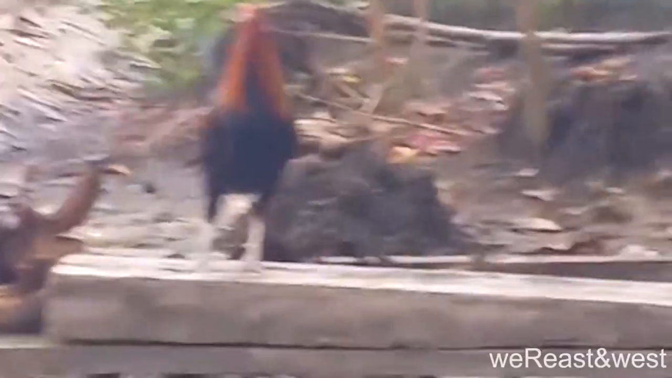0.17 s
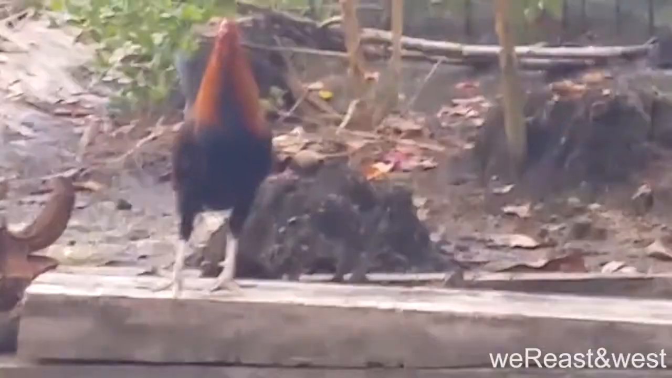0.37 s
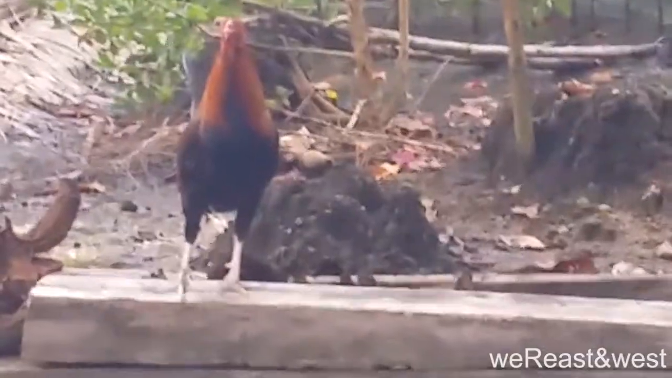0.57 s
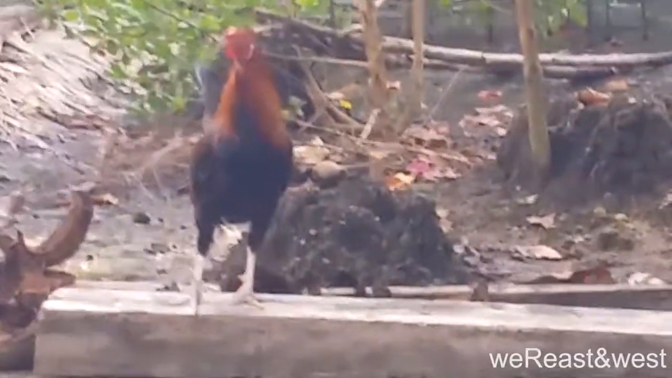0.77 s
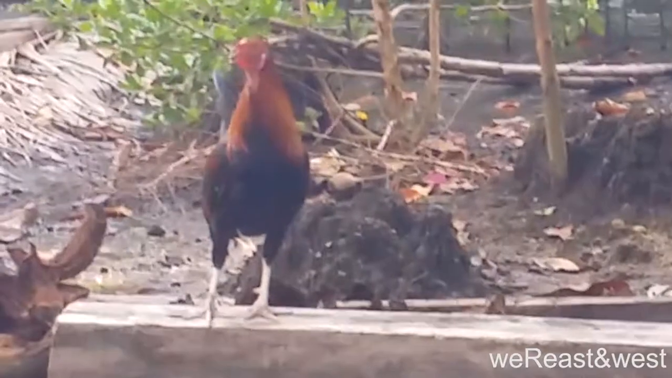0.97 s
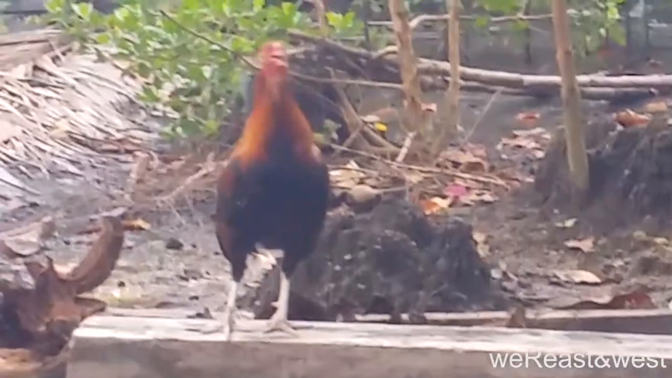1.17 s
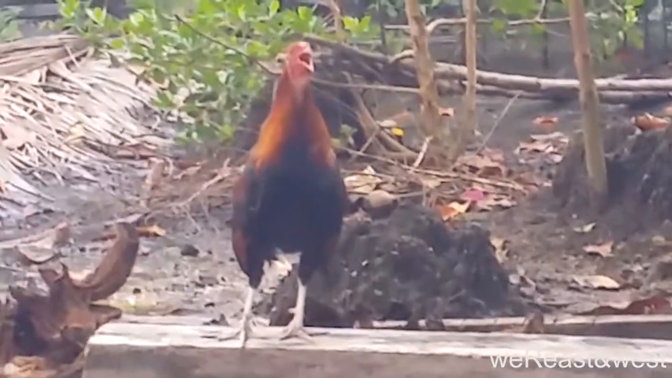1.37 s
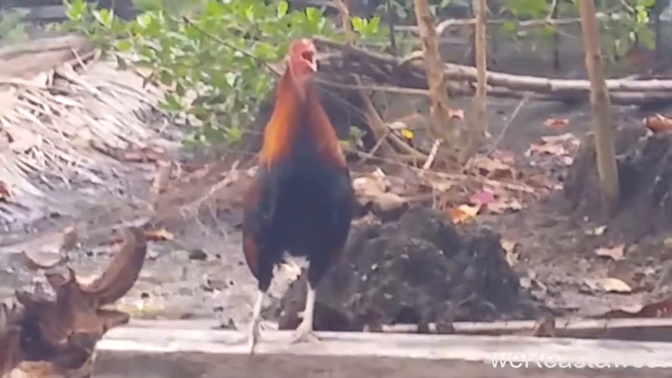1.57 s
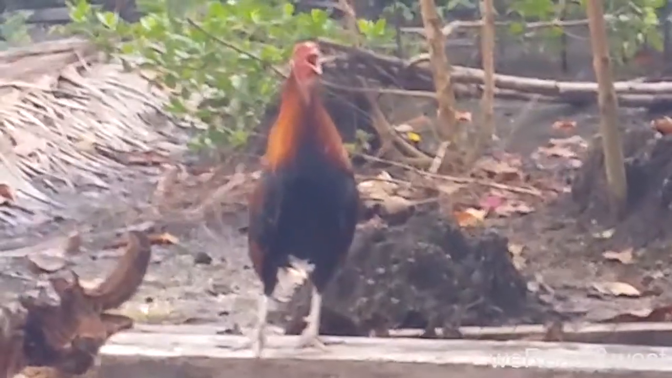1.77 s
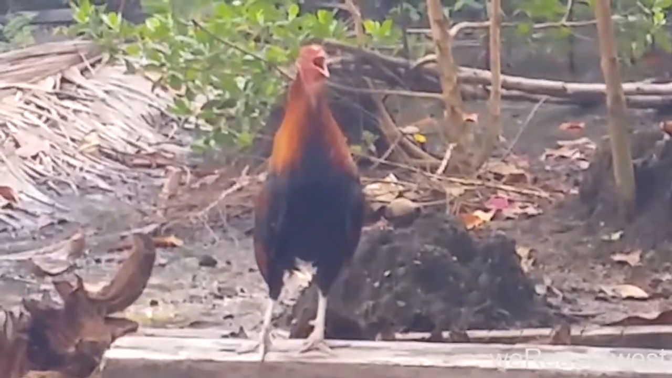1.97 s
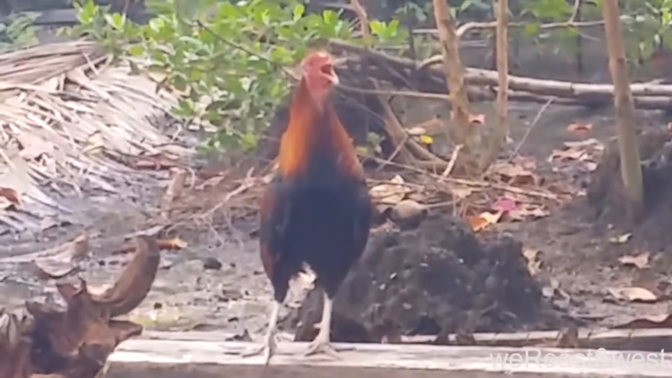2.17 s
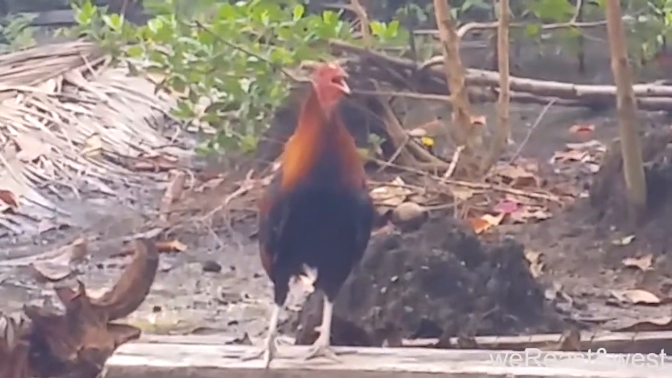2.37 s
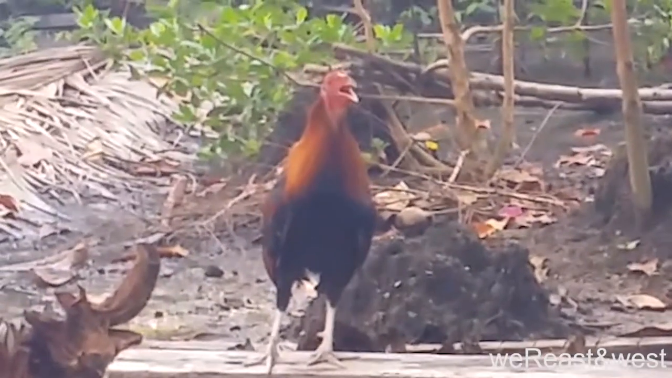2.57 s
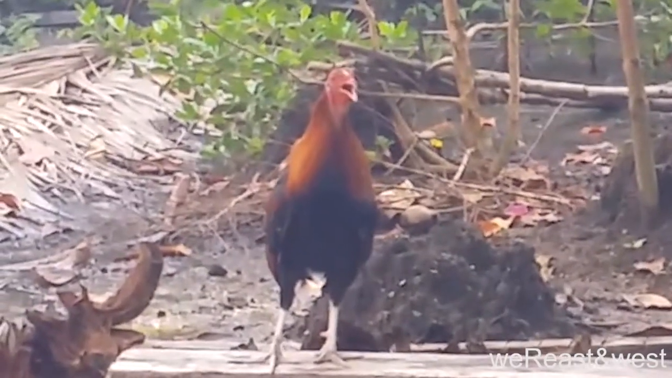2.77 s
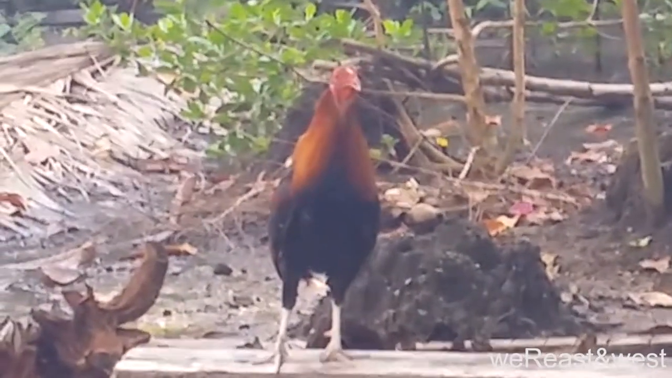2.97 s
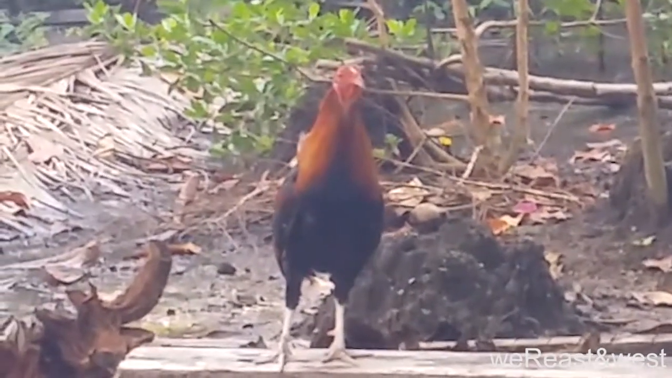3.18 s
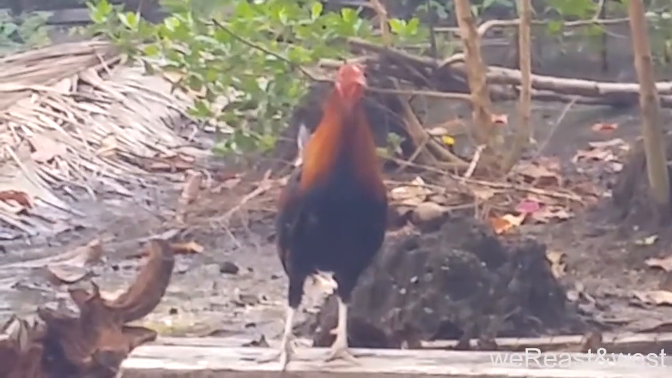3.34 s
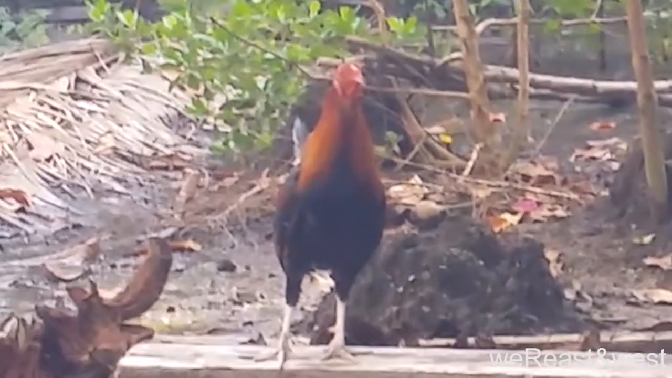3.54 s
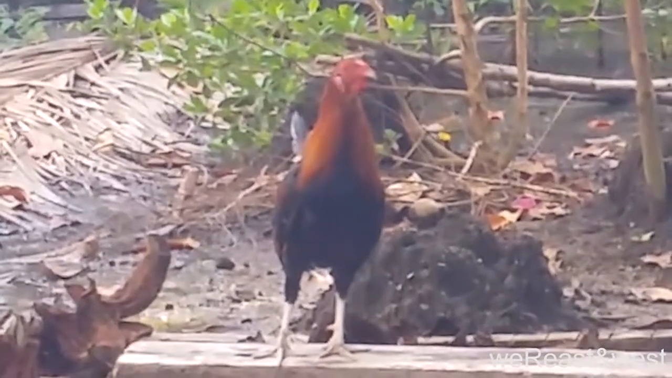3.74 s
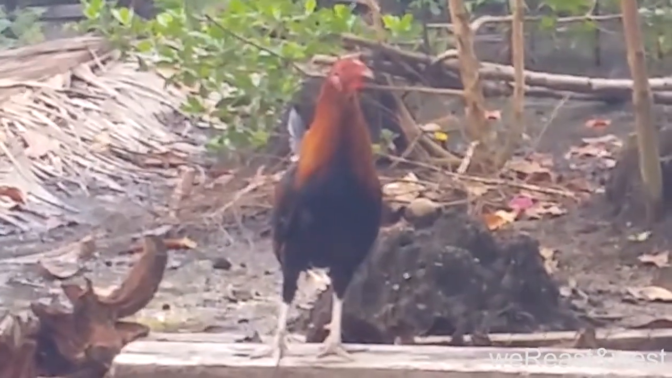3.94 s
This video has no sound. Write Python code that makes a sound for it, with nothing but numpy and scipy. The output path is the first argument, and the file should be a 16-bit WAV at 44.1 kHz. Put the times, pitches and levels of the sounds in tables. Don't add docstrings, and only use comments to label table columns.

```python
import sys
import numpy as np
from scipy import signal
from scipy.fft import rfft, irfft
from scipy.io import wavfile
from scipy.ndimage import uniform_filter1d

SR = 44100
rng = np.random.default_rng(int(sys.argv[2]) if len(sys.argv) > 2 else 0)


def field_ratio(decibels):
    return 10 ** (np.asarray(decibels, dtype=float) / 20)


def waveform_to_disk(signal):
    frames = np.transpose(np.atleast_2d(signal))
    scaled = np.clip(frames, -1, 1) * 32767
    samples = np.round(scaled).astype(np.int16)
    wavfile.write(sys.argv[1], SR, samples)


N = 176400
T = np.arange(N) / SR


def evened(x):
    return x / np.sqrt(np.mean(x ** 2) + 1e-20)


def read(points, hz):
    f, value = np.transpose(points)
    return np.interp(np.log(hz + 1), np.log(f + 1), value)


def track(points, column=1):
    columns = np.transpose(points)
    return np.interp(T, columns[0], columns[column])


def wander(rate_hz):
    hz = np.fft.rfftfreq(N, 1 / SR)[:8000]
    a, b = rng.standard_normal((2, 8000))
    return evened(irfft((a + 1j * b) * (hz > 0) / (1 + (hz / rate_hz) ** 2), N))


def bell(hz, centre_hz, width_hz):
    return 1 / (1 + (2 * (hz - centre_hz) / width_hz) ** 2)


def resonate(x, hz, width_hz):
    turn = np.exp(2j * np.pi * np.cumsum(hz * np.ones(N)) / SR)
    r = np.exp(-np.pi * width_hz / SR)
    return 2 * (turn * signal.lfilter([(1 - r) ** 2], [1, -2 * r, r * r], x / turn)).real


def echoes(x, t60_s, gap_s):
    t = T[:SR]
    taps = np.zeros((2, SR))
    at = np.arange(0, SR - 20, 20) + rng.integers(0, 20, (2, (SR - 1) // 20))
    np.put_along_axis(taps, at, rng.choice([-1., 1.], at.shape), 1)
    taps *= field_ratio(-60 * t / t60_s) * np.clip((t - gap_s) / 0.03, 0, 1)
    return signal.fftconvolve(x[None], taps / np.linalg.norm(taps[0]), axes=1)[:, :N]


# hz, density_db
HISS = [(40, -68), (130, -4.5), (300, -21), (620, -32), (1200, -35), (2600, -36.5), (8500, -46.5),
        (15500, -67)]
# hz, correlation
SAME = [(60, 1), (240, 0.96), (950, 0.26), (3770, -0.35), (15000, 0.32)]


def hiss():
    level_db, patch_db = -16.5, -0.5
    frames, hz = N // 256 + 5, np.fft.rfftfreq(1024, 1 / SR)
    a, b, c, d, patches = rng.standard_normal((frames, 513, 5)).T
    patches = evened(uniform_filter1d(uniform_filter1d(patches, 12, 0), 14, 1))
    same = np.clip(read(SAME, hz), -1, 1)[:, None]
    left = a + 1j * b
    right = same * left + np.sqrt(1 - same ** 2) * (c + 1j * d)
    z = np.array([left, right]) * field_ratio(read(HISS, hz)[:, None] + patch_db * patches)
    noise = evened(signal.istft(z, nperseg=1024, noverlap=768)[1][:, :N])
    return field_ratio(level_db + track(ENGINE, 2) + 12) * noise


# start_s, brightness_db_per_octave, level_db
ENGINE = [(0, -4.5, -21.5), (0.299, 2, -18), (1.199, 1.5, -17.5), (1.5, -13.5, -12), (2.199, -2, -17.5),
          (2.9, -9, -14.5), (3.102, -3.5, -16), (3.379, -13, -14.5), (3.55, 1, -15), (3.61, -0.5, -19.5),
          (4, -3, -20)]
# start_s, firing_hz
FIRING = [(0, 34.1), (1.2, 34.25), (1.6, 33.2), (2.1, 32.2), (3.6, 31.9), (4, 32.8)]
# hz, level_db
EXHAUST = [(34, -64), (68, -26.5), (136, 5), (205, 1), (240, -16), (310, -13), (480, -23.5), (700, -60)]
# start_s, lag_s
ENGINE_LAG = [(0, .00023), (1.0, .00023), (1.4, 0), (2.6, -.0001), (3.0, .0001), (4, .00013)]


def engine():
    drift_db, drift_hz, spread_rad, disperse_rad = 1.6, 1.2, .4, .035
    whine_hz, whine_width_hz, whine_db, whine_swell_db = 828, 66, -30, 1.5
    bass_lean_db = 1.9
    hz, tilt = track(FIRING), track(ENGINE, 1)
    turns = 2 * np.pi * np.cumsum(hz) / SR
    throb = np.zeros(N)
    for k in range(1, 21):
        order_db = read(EXHAUST, k * hz) + tilt * np.log2(k / 4) + drift_db * wander(drift_hz)
        phase = k * turns - disperse_rad * k * k + spread_rad * wander(drift_hz)
        throb += field_ratio(order_db) * np.cos(phase)
    whine = evened(resonate(rng.standard_normal(N), whine_hz, whine_width_hz))
    x = evened(throb) + field_ratio(whine_db + whine_swell_db * wander(1.6)) * whine
    x = x * field_ratio(track(ENGINE, 2))
    lag = track(ENGINE_LAG)
    both = np.array([np.interp(T - lag / 2, T, x), np.interp(T + lag / 2, T, x)])
    return both * field_ratio([[bass_lean_db / 2], [-bass_lean_db / 2]])


# start_s, length_s, from_hz, to_hz, level_db
CHIRPS = [
    (0.401, 0.046, 3650, 5850, -41.5),
    (0.432, 0.098, 4340, 6780, -47.5),
    (0.467, 0.022, 6960, 6690, -37.5),
    (0.786, 0.026, 4430, 3300, -49),
    (3.26, 0.016, 4760, 3770, -41),
]


def birds():
    x = np.zeros(N)
    for start_s, length_s, from_hz, to_hz, level_db in CHIRPS:
        u = np.clip((T - start_s) / length_s, 0, 1)
        whistle = np.sin(2 * np.pi * np.cumsum(from_hz + (to_hz - from_hz) * u) / SR)
        x += field_ratio(level_db) * np.sin(np.pi * u) * wander(150) * whistle
    return .5 * x + field_ratio(11) * echoes(x, t60_s=0.47, gap_s=0.0029)


def tick():
    start_s, level_db, decay_s = 3.592, -32, 0.0014
    u = np.maximum(T - start_s, 0)
    return field_ratio(level_db) * (u > 0) * np.exp(-u / decay_s) * rng.standard_normal((2, N))


def yard(crow):
    return field_ratio(-12) * echoes(crow, t60_s=0.7, gap_s=0.02)


def scatter(close):
    high_pass = signal.butter(2, 4500, "high", fs=SR)
    treble = signal.lfilter(*high_pass, close.mean(0))
    return field_ratio(-2) * echoes(treble, t60_s=.03, gap_s=0.00033)


# start_s, strongest_partial_hz, tone_db, half_pitch_db, rasp_db
FIRST = [
    (1.209, 1393, -50.5, -22, -60),
    (1.22, 1395, -31, -36, -8),
    (1.239, 1624, -24, -41, -24.5),
    (1.243, 1846, -2.5, -21, -38),
    (1.334, 1878, -3, -15, -33.5),
    (1.355, 1810, -4, -44, -16),
    (1.372, 1754, -12, -2.5, -19),
    (1.402, 1830, -18.5, 8.5, -24),
    (1.489, 1860, -27, -13, -38),
]
SECOND = [
    (1.497, 1632, -43, -16, -32),
    (1.511, 1636, -29, 8.5, -13),
    (1.52, 1888, -5.5, -10, -28.5),
    (1.543, 2133, -6, -45, -30.5),
    (1.585, 2116, -7, -57, -52),
    (1.625, 1930, -3, -45, -44),
    (1.674, 1907, -6, -27, -38),
    (1.719, 1921, -5.5, -46, -37.5),
    (1.77, 1939, -4.5, -40, -52),
]
THIRD = [
    (1.814, 1952, -5.5, -36, -31.5),
    (1.844, 1970, -1.5, -52, -43.5),
    (1.862, 2062, -4, -31, -31.5),
    (1.895, 2058, -8, -2.5, -39.5),
    (1.918, 2038, -6, -25, -29),
    (1.999, 2083, -6.5, -36, -26.5),
    (2.07, 2024, -7, -32, -25),
    (2.095, 1916, -4, -39, -40),
    (2.125, 1910, -9, -26, -25.5),
]
FOURTH = [
    (2.146, 1881, -19.5, 9, -16),
    (2.21, 1844, -19.5, -0.5, -18),
    (2.26, 1560, -41, 12, -9),
    (2.274, 1812, -13, -30, -7.5),
    (2.297, 1875, 0, -25, -45),
    (2.323, 2045, -7.5, -14, -53.5),
    (2.38, 1937, -10.5, 4, -34),
    (2.409, 2031, -10, -8, -43.5),
    (2.517, 1987, -13, 0.5, -48.5),
    (2.597, 1983, -15.5, 3, -45.5),
]
LAST = [
    (2.603, 1858, -7.5, -5, -25.5),
    (2.64, 1815, -14, 1, -20),
    (2.693, 1783, -10.5, -6.5, -26),
    (2.74, 1779, -9, -11, -35.5),
    (2.777, 1749, -8, -13.5, -43),
    (2.793, 1587, -23.5, -6.5, -11),
    (2.809, 1412, -25, -9, -18.5),
    (2.85, 1372, -55, -0.5, -6),
]
# start_s (centre), half_length_s, rasp_db, pitch_slip_hz, tone_dip_db
STUMBLES = [(1.546, 0.0066, -35.5, -3, 6), (1.626, 0.0064, -39.5, -16.5, 8.5), (1.658, 0.0075, -22, 0.5, 2),
            (1.685, 0.0069, -19.5, -1, 2.5), (1.703, 0.003, -26, 1.5, -3.5),
            (1.746, 0.0071, -27.5, 10, 1.5), (1.794, 0.006, -24, 16.5, 1), (1.817, 0.0043, -23, 1, -3),
            (1.827, .005, -35.5, 92.5, 3.5), (1.856, .004, -24, 87, 8.5), (1.924, 0.0081, -18, 0, 1),
            (1.942, 0.0067, -16.5, -48, 3.5), (1.968, 0.0063, -20, 0.5, 2.5),
            (2.004, .006, -24.5, 0.5, 1.5), (2.035, 0.0059, -20.5, 2, 2.5), (2.056, 0.0087, -20, -0.5, 0.5),
            (2.073, 0.0072, -20, -1, -0.5), (2.133, .012, -14, -2, -1.5), (2.624, 0.0081, -14.5, 0, 3),
            (2.685, 0.017, -13, 2, 0)]


def syrinx():
    wobble, shake = 0.002, .024
    course = np.array(FIRST + SECOND + THIRD + FOURTH + LAST)
    top_hz, tone_db, half_db, rasp_db = (track(course, i) for i in range(1, 5))
    lapse = np.array([np.exp(-((T - at_s) / half_s) ** 2) for at_s, half_s, *_ in STUMBLES])
    _, _, lapse_db, slip_hz, dip_db = np.transpose(STUMBLES)
    rasp_db = 20 * np.log10(field_ratio(rasp_db) + field_ratio(lapse_db) @ lapse)
    tone_db = tone_db - dip_db @ lapse
    rough = np.sqrt(np.minimum(field_ratio(rasp_db - tone_db), .5))
    hz = (top_hz + slip_hz @ lapse) / 4
    hz = hz * (1 + wobble * wander(60) + shake * rough * wander(120))
    return hz, tone_db, half_db, rasp_db, rough


# start_s, resonance_hz, level_db
BEAK, BEAK_WIDTH_HZ = [(1.2, 7100, -5.5), (1.601, 6770, -11.5), (1.9, 6227, -13.5), (2.2, 5920, -16.5),
                       (2.35, 7200, -8), (2.6, 6864, -3), (2.85, 7070, -4)], 720
# start_s, level_db
GULLET, GULLET_HZ, GULLET_WIDTH_HZ = [(1.2, -4.5), (1.55, 5), (1.7, 13.5), (2.1, 9.5), (2.28, -2),
                                      (2.4, 2.5), (2.75, -26), (2.82, -1)], 3640, 330
# start_s, resonance_hz, level_db
MOUTH, MOUTH_WIDTH_HZ = [(1.221, 2636, 14), (1.27, 2430, 7.3), (1.7, 2480, 13.4), (1.88, 2558, 12.4),
                         (1.93, 2510, 16.7), (2.27, 2450, 3.4), (2.33, 2550, 9.9), (2.588, 2463, 4.8),
                         (2.62, 2101, 3.6), (2.8, 2180, 0.91)], 326


def cavities():
    beak = field_ratio(track(BEAK, 2)) / np.sqrt(BEAK_WIDTH_HZ)
    gullet = field_ratio(track(GULLET)) / np.sqrt(GULLET_WIDTH_HZ)
    mouth = field_ratio(track(MOUTH, 2)) / np.sqrt(MOUTH_WIDTH_HZ)
    return (track(BEAK), beak), (GULLET_HZ, gullet), (track(MOUTH), mouth)


# hz, level_db
TRACT = [(850, -1.5), (1050, -11.5), (1400, -0.5), (1900, 8), (2500, -6), (3700, -10.5), (7000, -1),
         (15000, -5.5)]
# resonance_hz, width_hz, level_db
PIPE = [(803, 103, 3), (1296, 214, 2.5), (1967, 533, 7), (5000, 3500, -8.5), (9400, 8300, -15.5)]
# start_s, level_db
LOWEST = [(1.235, 6.5), (1.26, -3), (1.5, 4), (1.7, 8), (1.8, 2), (2.1, 4.5), (2.3, -4.5), (2.58, 2),
          (2.62, 0.5), (2.77, -1.5), (2.8, 3.5)]
# start_s, level_db
THIRDS = [(1.645, -62), (1.66, -25), (1.70, -23), (1.715, -60), (1.9, -60), (1.915, -17), (2.0, -28),
          (2.08, -16), (2.095, -60)]


def voice(hz, tone_db, half_db, rough):
    flutter_db, throb_db, shake_db, smear_rad = 2, 1.0, 2.5, .3
    quarter_s, quarter_length_s, quarter_depth = 3.5, 0.033, 0.56
    (beak_hz, beak), (gullet_hz, gullet), (mouth_hz, mouth) = cavities()
    grid = np.arange(0., 20000, 20)
    pipe = sum(field_ratio(db) / np.sqrt(w) * bell(grid, f, w) for f, w, db in PIPE)
    pipe = pipe * field_ratio(read(TRACT, grid))

    def windpipe(f):
        return np.interp(f, grid, pipe)

    def cavity(f):
        return mouth * field_ratio(read(TRACT, 2500)) * bell(f, mouth_hz, MOUTH_WIDTH_HZ) ** 1.66

    turns, x = 2 * np.pi * np.cumsum(hz) / SR, np.zeros(N)
    lowest_db = track(LOWEST)
    for k in range(2, 31):
        f = k * hz
        way = windpipe(f) + (k > 4) * cavity(f)
        way += beak * field_ratio(read(TRACT, 7000)) * bell(f, beak_hz, BEAK_WIDTH_HZ)
        way += gullet * field_ratio(read(TRACT, 3700)) * bell(f, gullet_hz, GULLET_WIDTH_HZ)
        line_db = k % 2 * half_db + (k == 2) * lowest_db + (abs(k - 4) > 1) * flutter_db * wander(41)
        phase = k * turns + k * k + smear_rad * rough * (k - 4) * wander(104)
        x += way * field_ratio(line_db) * np.cos(phase)
    thirds_db = track(THIRDS) + 1.3 * wander(49)
    for k in (2, 4, 5, 7, 8, 10, 11):
        f = k * hz * 2 / 3
        line = np.cos(k * turns * 2 / 3 + 0.49 * wander(49))
        x += (windpipe(f) + cavity(f)) * field_ratio(thirds_db + 1.3 * wander(40)) * line
    level_db = tone_db + throb_db * wander(45) + shake_db * rough * wander(106)
    x *= np.sqrt(2) * field_ratio(level_db) / windpipe(4 * hz)
    quarter = np.exp(-((T - quarter_s) / quarter_length_s) ** 2)
    return x * (1 + quarter_depth * quarter * np.cos(turns / 2))


def rasp(hz):
    jitter, lump_db, gullet_db = 0.27, 2.2, -6
    (beak_hz, beak), (gullet_hz, gullet), (mouth_hz, mouth) = cavities()
    beats = np.cumsum(2 * hz * field_ratio(8.7 * jitter * wander(400))) / SR
    pulses = np.diff(np.floor(beats), prepend=0) * (1 + .5 * rng.standard_normal(N))
    drive = evened(pulses - pulses.mean()) + .5 * rng.standard_normal(N)
    drive = drive * field_ratio(lump_db * wander(120))
    x = np.zeros(N)
    for k, (f, w, db) in enumerate(PIPE):
        x += (-1) ** k * field_ratio(db) * resonate(drive, f, w) / np.sqrt(w)
    x -= mouth * resonate(drive, mouth_hz, MOUTH_WIDTH_HZ)
    x += beak * resonate(drive, beak_hz, BEAK_WIDTH_HZ)
    x -= field_ratio(gullet_db) * gullet * resonate(drive, gullet_hz - 120, 2 * GULLET_WIDTH_HZ)
    return evened(x)


def rooster():
    breath_db, release_s = -31.5, .03
    hz, tone_db, half_db, rasp_db, rough = syrinx()
    gate = (T > FIRST[0][0]) * np.clip((LAST[-1][0] - T) / release_s, 0, 1)
    noise = rasp(hz) * (field_ratio(rasp_db) + field_ratio(tone_db + breath_db))
    return gate * (voice(hz, tone_db, half_db, rough) + noise)


# hz, level_db
LEAN = [(900, 3), (1720, 6), (1880, 2), (2140, -7.5), (2600, -11), (3800, 2), (7000, 14.5), (12000, 5.5)]
# dip_hz, width_hz, depth_db
NOTCHES = [(4400, 400, 8)]


def ports(crow):
    port_lag_s, bowed_s = .00008, 1.98
    hz = np.fft.rfftfreq(N, 1 / SR)

    def dip(f, width_hz, depth_db):
        return field_ratio(-depth_db * np.exp(-((hz - f) / width_hz) ** 2))

    bowed = np.clip((T - bowed_s) / .1, 0, 1)
    z = rfft(crow * (1 - bowed)) + rfft(crow * bowed) * dip(10080, 642, 16.4)
    z = z * dip(*NOTCHES[0]) * dip(3080, 300, 6)
    half = field_ratio(read(LEAN, hz) / 2) * np.exp(1j * np.pi * hz * port_lag_s)
    even_power = np.sqrt(2 / (abs(half) ** 2 + abs(half) ** -2))
    return irfft(z * np.array([half, 1 / half]) * even_power, N)


def ducking(crow):
    from_db, share, recover_db_per_s = -28.5, 0.29, 85
    power_db = 10 * np.log10(abs(uniform_filter1d(crow ** 2, 400)) + 1e-12)
    fall_db = T * recover_db_per_s
    held_db = np.maximum.accumulate(power_db + fall_db) - fall_db
    over_db = np.maximum(held_db - from_db, 0)
    return 1 / field_ratio(share * uniform_filter1d(over_db, 200))


def scene():
    crow = rooster()
    background = hiss() + engine() + birds() + tick() + yard(crow)
    close = ports(crow)
    return close + scatter(close) + background * ducking(crow)


def top_cut(x):
    return signal.sosfilt(signal.butter(12, 15740, fs=SR, output="sos"), x)


def record(dry):
    edge_hz, overload = 15700, 1.0
    low_pass = signal.firwin(511, edge_hz, window=("kaiser", 9), fs=SR)
    x = signal.oaconvolve(dry, low_pass[None], "same")
    return top_cut(np.clip(x, -overload, overload))


dry = scene()
out = record(dry)
waveform_to_disk(out)
```